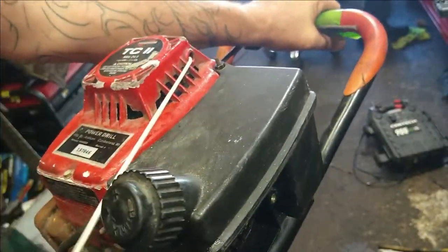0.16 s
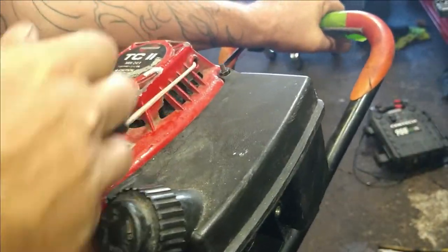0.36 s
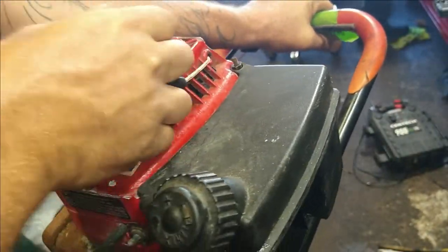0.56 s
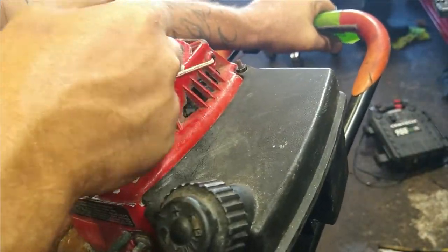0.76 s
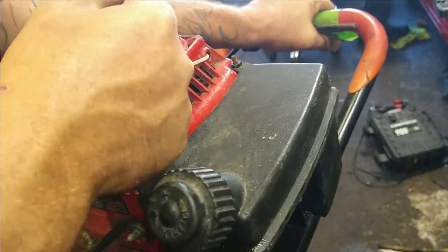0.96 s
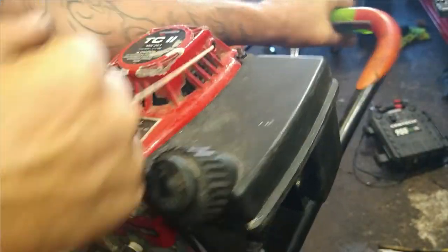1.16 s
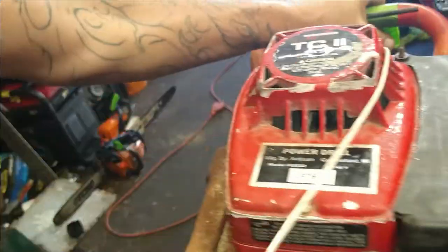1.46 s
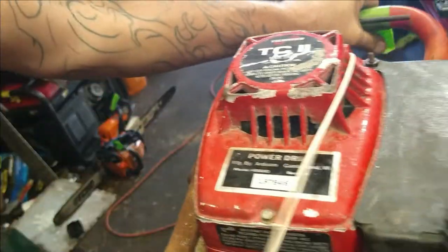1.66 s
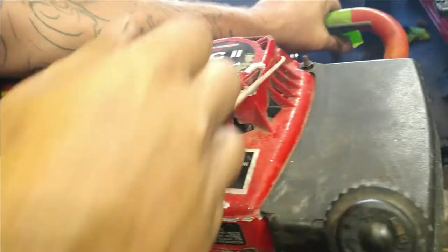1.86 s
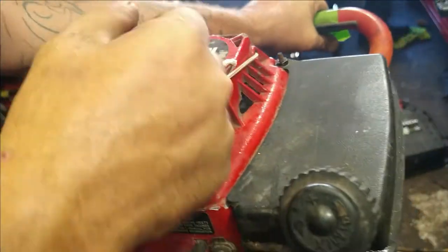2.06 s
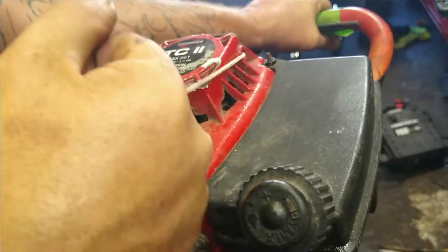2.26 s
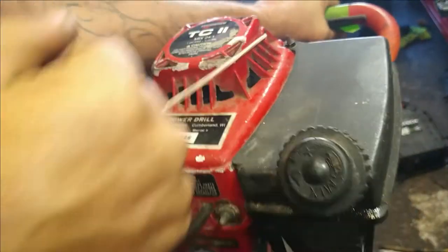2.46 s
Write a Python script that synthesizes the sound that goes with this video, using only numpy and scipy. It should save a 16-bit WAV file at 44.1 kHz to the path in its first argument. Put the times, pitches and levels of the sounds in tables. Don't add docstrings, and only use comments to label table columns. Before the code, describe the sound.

Close stereo phone pickup of a starter rope being pulled on a small two-stroke engine: metallic clicking rewind, knocks, rough cranking pull, slowing rewind and one last cut-off pull, over faint room hum.

```python
import sys
import numpy as np
from scipy import signal
from scipy.fft import rfft, irfft
from scipy.io import wavfile
from scipy.ndimage import uniform_filter1d

SR = 44100
rng = np.random.default_rng(int(sys.argv[2]) if len(sys.argv) > 2 else 0)


def field_ratio(decibels):
    return 10 ** (np.asarray(decibels, dtype=float) / 20)


def pcm_store(signal):
    levels = np.round(np.clip(np.atleast_2d(signal), -1, 1) * 32767)
    wavfile.write(sys.argv[1], SR, levels.astype(np.int16).T)


N = 114660
T = np.arange(N) / SR

# [Hz, dB per Hz]
RUMBLE_SPECTRUM = [(15, -48), (25, -41), (86, 1.5), (141, 7), (384, -4.5), (454, -15), (700, -5),
                   (910, -35.5), (1540, -120)]


def unit(x):
    return x / np.sqrt(np.mean(x ** 2))


def butter(x, order, hz, kind="low"):
    return signal.lfilter(*signal.butter(order, hz, kind, fs=SR), x)


def colour(x, points):
    point_hz, point_db = np.array(points, float).T
    bin_hz = np.arange(2049) * SR / 4096
    db = np.interp(np.log(bin_hz + 9), np.log(point_hz), point_db)
    cepstrum = irfft(db * np.log(10) / 20)
    cepstrum[1:2048] *= 2
    cepstrum[2049:] = 0
    h = irfft(np.exp(rfft(cepstrum)))
    h = h / np.sqrt(np.sum(h ** 2))
    return signal.fftconvolve(x, np.atleast_2d(h), axes=1)[:, :N]


def curve(tables):
    gain = np.zeros(N)
    for rows in tables:
        time_s, level_db = np.array(rows, float).T
        gain += field_ratio(np.interp(T, time_s, level_db, left=-120, right=-120))
    return uniform_filter1d(gain, size=200, mode="nearest")


def grit(spread_db, channels=1):
    shared = 0.3
    own = rng.standard_normal((channels, N))
    noise = np.sqrt(shared) * rng.standard_normal(N) + np.sqrt(1 - shared) * own
    return unit(noise * field_ratio(spread_db * rng.exponential(size=N)))


def walk(rate_hz):
    hold = int(SR / rate_hz)
    steps = np.repeat(rng.standard_normal(N // hold + 1), hold)
    return uniform_filter1d(steps, hold)[:N]


def bursts(rows, rise_s, fall_s):
    time_s, level_db = np.array(sorted(rows), float).T
    env = np.bincount((time_s * SR).astype(int), field_ratio(level_db), N)
    for tau_s in (rise_s, fall_s):
        env = signal.lfilter([1], [1, -np.exp(-1 / (tau_s * SR))], env)
    return env / (rise_s * SR), np.searchsorted(time_s, T)


def mode_pole(hz, width_hz):
    return np.exp((2j * np.pi * hz - np.pi * width_hz) / SR)


def resonate(x, modes, which, scatter_db):
    mono_below_hz = 1560
    out = 0
    luck = rng.standard_normal((which.max() + 1, len(modes), 3))
    for k, (hz, width_hz, db) in enumerate(modes):
        strength = field_ratio(db + scatter_db * luck[:, k, 0])
        gain = strength * np.exp(1j * min(hz / mono_below_hz, 1) * luck[:, k, 1:].T)
        ring = np.imag(signal.lfilter([1], [1, -mode_pole(hz, width_hz)], x * gain[:, which]))
        out = out + np.sqrt(2 * np.pi * width_hz / SR) * ring
    return out


def sing(hz, tables):
    phase = 2 * np.pi * np.cumsum(hz + 2.4 * walk(25)) / SR
    return np.sqrt(2) * curve(tables) * field_ratio(0.88 * walk(61)) * np.sin(phase + np.array([[0], [1.4]]))


def ratchet():
    # [s, dB]
    first_clicks = [(0.0218, -20), (0.069, -26), (0.1097, -11.5), (0.1339, -13.5), (0.155, -15.5),
                    (0.1795, -12), (0.198, -13), (0.214, -14), (0.2333, -12), (0.2494, -18.5),
                    (0.2706, -12), (0.2934, -20.5), (0.3115, -17), (0.3374, -14), (0.3614, -10.5),
                    (0.4056, -9), (0.544, -16), (0.806, -42.5)]
    later_clicks = [(1.1303, -15), (1.2037, -23), (1.46, -18.5), (1.481, -17.5), (1.497, -15),
                    (1.5204, -10.5), (1.5374, -12), (1.5858, -8.5), (1.619, -11.5), (1.632, -16),
                    (1.6494, -11), (1.6694, -16.5), (1.6894, -9.5), (1.7025, -17), (1.721, -14.5),
                    (1.7414, -15), (1.7624, -13.5), (1.786, -14.5), (1.8105, -9.5), (1.8337, -14.5),
                    (1.8662, -11), (1.9036, -11.5), (1.9559, -14.5), (1.9654, -13), (2.0454, -24),
                    (2.0612, -19), (2.379, -39.5), (2.4648, -10.5), (2.4964, -14)]
    # [s, dB]
    drag_levels = [
        [(0, -36), (.1, -34.5), (.2, -21.5), (.28, -22), (.36, -35), (.45, -44)],
        [(1.13, -49), (1.2, -49), (1.3, -32.5), (1.46, -27.5), (1.6, -32.5), (1.66, -20.5), (1.79, -31.5),
         (1.95, -39.5)],
    ]
    # [Hz, Hz, dB]
    first_cup = [(3550, 43, -1), (3900, 32, -3), (4340, 60, -2), (5110, 59, -6), (8050, 39, -11),
                 (9330, 27, -3), (10100, 27, -7), (10800, 72, -16), (12300, 33, -16), (13400, 48, -5),
                 (13900, 37, -2), (14200, 80, -7), (15200, 110, -15), (15700, 43, -17)]
    later_cup = [(4050, 41, -4), (4330, 120, 0), (5110, 160, -7), (8050, 53, -8), (9330, 42, -6),
                 (9840, 63, -9), (10800, 54, -10), (12500, 54, -12), (13000, 35, -3), (13400, 87, -4),
                 (13900, 34, -6), (14200, 45, -5), (15200, 61, -9), (15700, 67, -11)]
    # [Hz, dB per Hz]
    crack_spectrum = [(240, -43), (400, -15.5), (1870, -11.5), (4240, -3), (8760, -16), (9920, -3.5),
                      (11400, -16.5), (13700, -8.5), (16000, -27.5)]
    # [s, dB]
    washer_levels = [
        [(.24, -48), (.31, -32), (.38, -32), (.45, -40), (.53, -54), (.66, -70)],
    ]
    # [s, dB]
    rim_levels = [
        [(.11, -42), (.2, -33), (.3, -37), (.45, -52)],
        [(1.48, -40), (1.76, -35), (1.84, -37), (1.93, -52)],
    ]
    held_s, regrip_s, held_db = 0.395, 1.455, -5.5
    low_modes_db, low_damping, high_damping = 2, 0.6, 0.76

    clicks = list(first_clicks) + list(later_clicks)
    env, which = bursts(clicks, rise_s=0.002, fall_s=0.0056)
    env = env + field_ratio(4.5) * curve(drag_levels) * field_ratio(5.3 * walk(58.93))
    held = (T > held_s) & (T < regrip_s)
    hits = env * grit(2.17) * np.where(held, field_ratio(held_db), 1)
    ring = 0
    for cup, grip in ((first_cup, T < regrip_s), (later_cup, T >= regrip_s)):
        modes = []
        for hz, width_hz, db in cup:
            if hz < 6000:
                modes.append((hz, low_damping * width_hz, db + low_modes_db))
            else:
                modes.append((hz, high_damping * width_hz, db))
        ring = ring + resonate(hits * grip, modes, which, scatter_db=1)

    tooth_lag_s = 0.00192
    teeth = bursts([(t + tooth_lag_s, db) for t, db in clicks], rise_s=0.00014, fall_s=0.00074)[0]
    crack = colour((env + field_ratio(4.0) * teeth) * grit(1.2, channels=2), crack_spectrum)
    singing = sing(3892, washer_levels) + sing(4393, rim_levels)
    return singing + field_ratio(-7) * ring + field_ratio(-6) * crack


def knocks():
    # [s, dB]
    blows = [(0.0094, -14.5), (0.0717, -14.5), (0.1775, -18.5), (0.213, -13), (0.2395, -24), (0.3225, -18),
             (0.384, -20), (1.2905, -14.5), (1.3555, -11.5), (1.4275, -27), (1.684, -16.5), (1.7885, -24),
             (1.867, -24), (0.2524, -18.5), (0.2733, -29), (0.3461, -19), (0.36, -17), (0.469, -19.5),
             (0.582, -23), (0.8041, -40), (1.0057, -42), (1.1298, -30.5), (1.1708, -17.5), (1.2033, -21),
             (1.261, -7.5), (1.3029, -7), (1.335, -16.5), (1.3786, -9), (1.3974, -11.5), (1.4626, -10.5),
             (2.0443, -17.5), (2.061, -20.5), (2.1075, -14), (2.281, -40.5), (2.4269, -26.5), (2.465, -6),
             (2.4966, -11), (2.5375, -15)]
    # [Hz, Hz, dB]
    housing_modes = [(756, 180, -6.5), (1130, 110, -15), (1543, 226, 2.5), (2260, 700, -1), (2590, 390, 1),
                     (4230, 430, -8.5), (6240, 2500, 1.5)]
    contact, which = bursts(blows, rise_s=0.00074, fall_s=0.0043)
    rattle = bursts(blows, rise_s=0.0052, fall_s=0.016)[0]
    soft = butter((contact + field_ratio(-13) * rattle) * grit(2.47), 2, 5060)
    return field_ratio(-5) * butter(resonate(soft, housing_modes, which, scatter_db=2.5), 2, 600, "high")


def rope():
    # [s, dB]
    rub_levels = [
        [(0, -25.5), (.06, -31), (.17, -33), (.3, -34), (.45, -51), (.6, -53.5)],
        [(1.13, -57), (1.18, -31.5), (1.235, -42), (1.255, -28.5), (1.42, -28), (1.5, -28), (1.6, -43),
         (1.9, -35.5), (2.0, -48), (2.2, -69)],
        [(2.42, -79), (2.462, -48), (2.47, -25.5), (2.53, -31), (2.6, -19.5)],
    ]
    # [Hz, dB per Hz]
    rasp_spectrum = [(180, -28.5), (300, -13), (946, 2.5), (1120, -1), (1230, -24.5), (1410, 4),
                     (1870, -3.5), (6520, -3.5), (16000, -24.5)]
    # [s, s, Hz, Hz, dB]
    squeal_row = (2.556, 2.593, 1450, 2350, -16)
    start_s, end_s, low_hz, high_hz, peak_db = squeal_row
    u = np.clip((T - start_s) / (end_s - start_s), 0, 1)
    hz = (low_hz + (high_hz - low_hz) * u ** 1.6) * (1 + 0.08 * walk(880))
    level = field_ratio(peak_db + 2 + 3 * walk(300)) * np.sin(np.pi * u ** 2.0)
    squeal = level * np.sin(2 * np.pi * np.cumsum(hz) / SR)
    squeal = squeal * (1 + field_ratio(8.0) * np.exp(-((T - 2.5847) / .001) ** 2))
    rub = curve(rub_levels) * field_ratio(3.2 * walk(90) + 1.15)
    rasp = colour(rub * grit(1.9, channels=2), rasp_spectrum)
    return squeal * field_ratio(np.array([[1.5], [-1.5]])) + rasp


def engine():
    # [s, dB]
    exhaust_puffs = [(0.3615, -27), (1.2618, -16.5), (1.2827, -23.5), (1.3351, -18), (1.3519, -20.5),
                     (1.3996, -28), (1.452, -23), (1.5105, -22.5), (2.5669, -23), (1.316, -13), (1.362, -9),
                     (1.376, -20), (1.4093, -9.5), (1.4262, -26), (1.4686, -16), (1.481, -10.5),
                     (1.558, -19), (2.5471, -13), (2.598, -9.5)]
    # [s, dB]
    crank_levels = [
        [(0, -27.5), (.1, -46), (.5, -56)],
        [(1.15, -37), (1.23, -40), (1.26, -26), (1.35, -48), (1.5, -43), (1.62, -36.5), (1.75, -47.5)],
        [(2.46, -49), (2.53, -44), (2.6, -34)],
    ]
    puff = 0
    for time_s, db in exhaust_puffs:
        length_ms = 5.2 - 0.04 * db
        u = (T - time_s) * 1000 / length_ms
        shape = np.tanh(u / .1) * np.exp(-np.abs(u) / .3) * np.where(u < 0, 2.6, 1.7)
        puff = puff - field_ratio(db) * shape
    puff = signal.filtfilt(*signal.butter(1, 90, "high", fs=SR), puff, padtype=None)
    pole = mode_pole(181, 23)
    ring = np.real(signal.lfilter([1 - abs(pole)], [1, -pole], puff))
    rumble = colour(curve(crank_levels) * field_ratio(4.1 * walk(39.6) - 2.5) * grit(0), RUMBLE_SPECTRUM)
    return puff + field_ratio(-17) * ring + rumble


def gust():
    # [s, dB]
    gust_levels = [
        [(1.17, -40), (1.185, -27), (1.225, -21), (1.27, -22), (1.3, -36), (1.55, -46)],
    ]
    wind = curve(gust_levels) * field_ratio(3.0 * walk(60)) * grit(0)
    return colour(wind, RUMBLE_SPECTRUM) * np.array([[1], [0]])


def shop():
    # [Hz, dB per Hz]
    hum_spectrum = [(15, -94.5), (25, -2), (206, -6.5), (263, -3), (293, -11), (363, -12), (516, -14),
                    (2350, -23.5), (16000, -55.5)]
    mid, side = colour(rng.standard_normal((2, N)) * field_ratio(0.86 * walk(6.7)), hum_spectrum)
    side = butter(side, 1, 300, "high")
    return field_ratio(-45.5) * (mid + side * np.array([[1], [-1]]))


def walls(dry):
    t60_s, first_echo_s, top_hz = 0.22, 0.004, 6450
    t = T[:SR // 2]
    tail = rng.standard_normal((2, len(t))) * 1000 ** (-t / t60_s) * (t > first_echo_s)
    tail[1] = tail[0] + butter(tail[1] - tail[0], 2, 400, "high")
    tail = unit(butter(tail, 1, top_hz)) / np.sqrt(len(t))
    return field_ratio(-10.5) * signal.fftconvolve(dry, tail, axes=1)[:, :N]


def scene():
    dry = ratchet() + knocks() + rope() + engine()
    return dry + walls(dry) + gust() + shop()


def roll_off(x):
    return signal.sosfilt(signal.butter(12, 16500, fs=SR, output="sos"), x)


def record(dry):
    port_lag_samples, split_hz, bass_left_db, treble_left_db = 6, 1200, 1, -0.5
    x = np.array([np.pad(dry[0], (port_lag_samples, 0))[:N], dry[1]])
    low = butter(x, 1, split_hz)
    sides = np.array([[.5], [-.5]])
    x = low * field_ratio(sides * bass_left_db) + (x - low) * field_ratio(sides * treble_left_db)
    x = signal.filtfilt(*signal.butter(2, 62.6, "high", fs=SR), x)
    x = np.tanh(x)
    mix = signal.sosfilt(signal.ellip(8, .2, 60, 16000, fs=SR, output="sos"), x)
    return roll_off(mix)


dry = scene()
out = record(dry)
pcm_store(out)
```